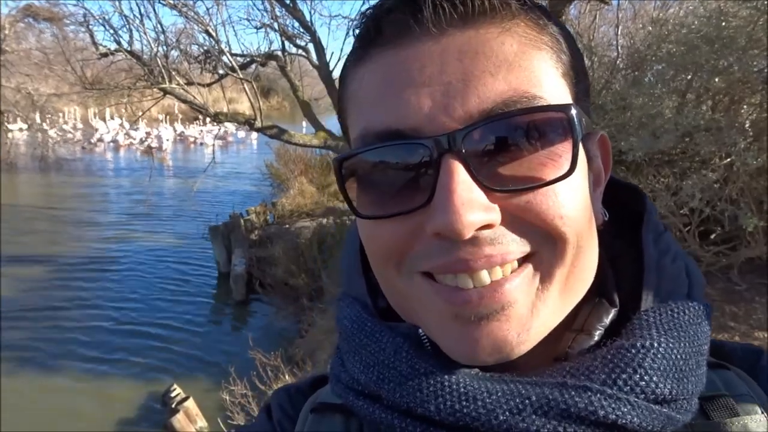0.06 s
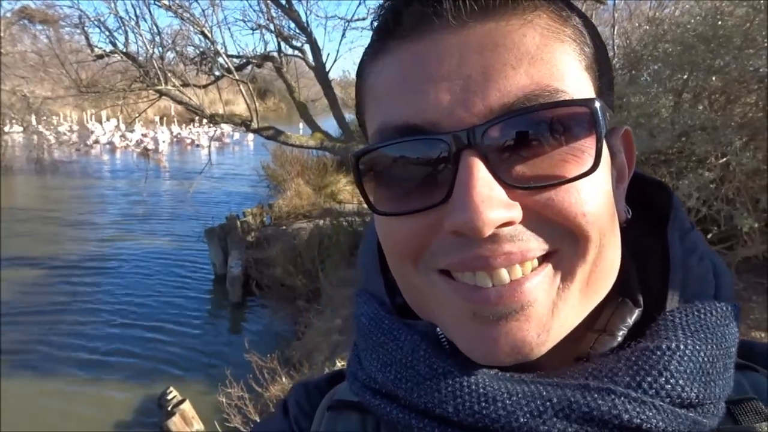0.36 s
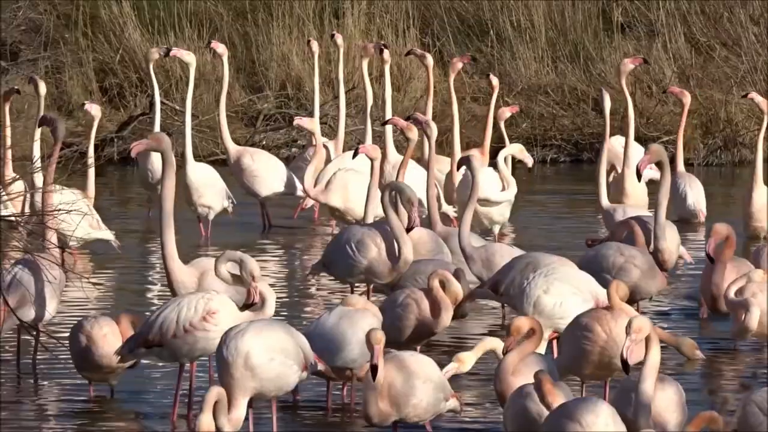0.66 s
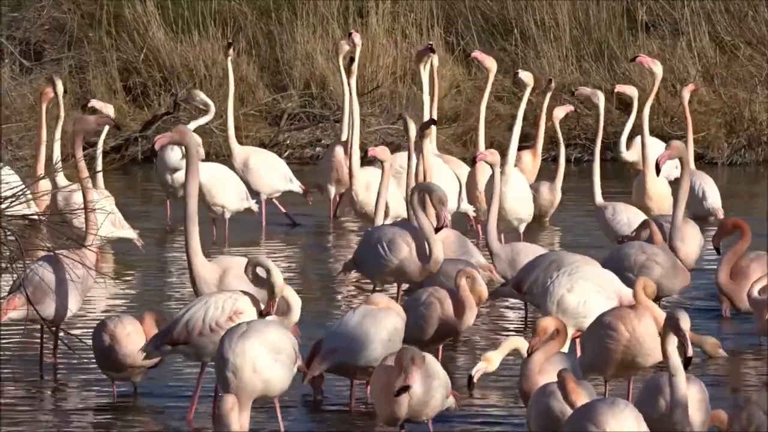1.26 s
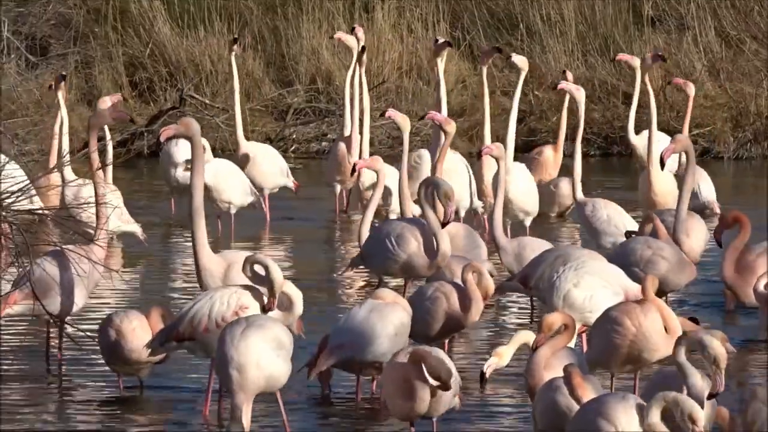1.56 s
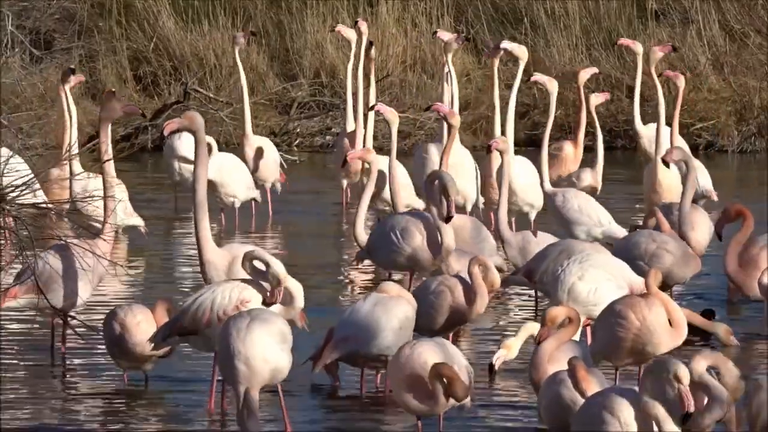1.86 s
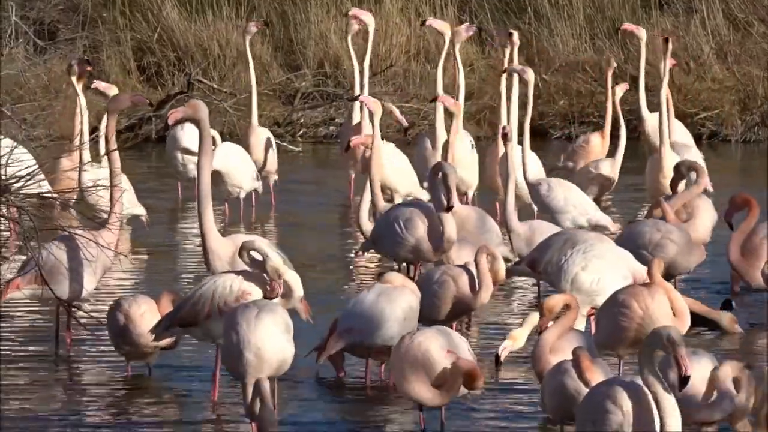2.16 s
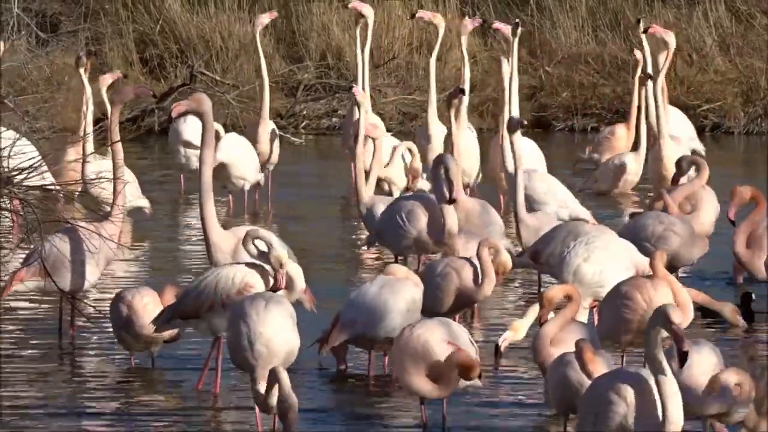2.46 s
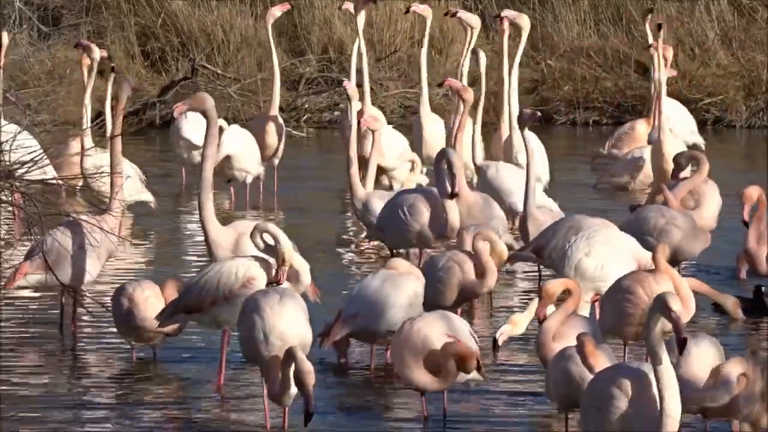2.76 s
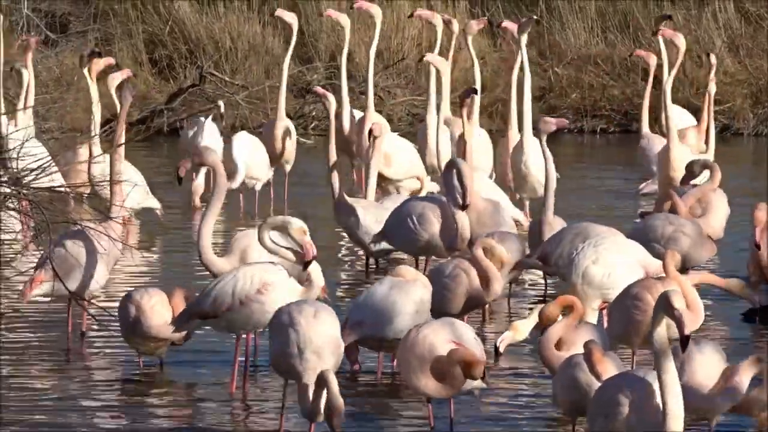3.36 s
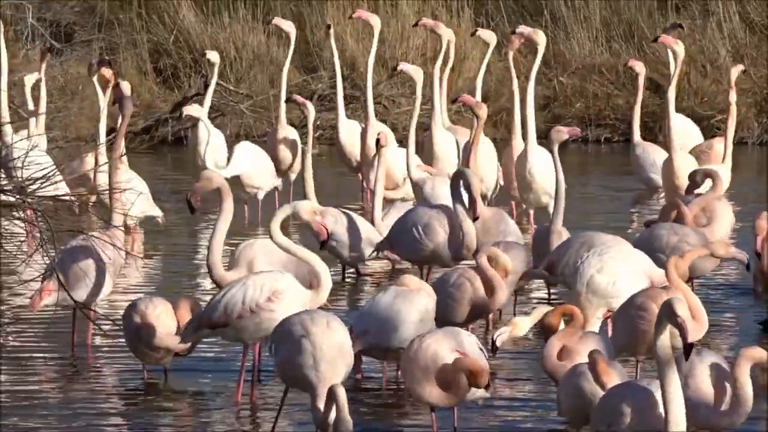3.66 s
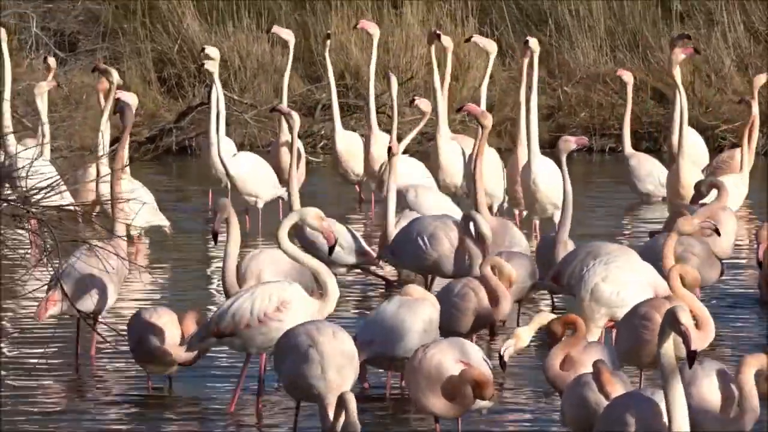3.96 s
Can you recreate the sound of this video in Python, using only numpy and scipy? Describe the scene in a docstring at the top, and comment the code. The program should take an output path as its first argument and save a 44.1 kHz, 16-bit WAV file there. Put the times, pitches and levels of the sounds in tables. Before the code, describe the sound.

Flamingos call on a shallow pond. From about 0.2 seconds one close bird, slightly left, gives four loud, rattling croaks that cut off abruptly at 0.6 seconds. From 0.7 seconds until the end at 4 seconds, the flock gabbles more quietly ahead, with overlapping croaks, short nasal honks and occasional hoarse rasps. Distant birds chatter underneath throughout, and the calls carry a faint outdoor echo.

```python
"""Flamingos in a shallow pond.

One close bird croaks four times until the sound cuts off abruptly; then the flock gabbles.
Croaks are pulse trains through throat resonances, honks are nasal harmonics shaped by the beak,
rasps are unvoiced air. Distant birds murmur, and the reedy bank gives a faint echo."""
import sys
import numpy as np
from scipy import signal
from scipy.fft import rfft, irfft, next_fast_len
from scipy.io import wavfile
from scipy.ndimage import map_coordinates

SR = 44100
rng = np.random.default_rng(int(sys.argv[2]) if len(sys.argv) > 2 else 0)


def int16_out(signal):
    """Quantize to a 16-bit WAV file."""
    q = np.round(np.clip(np.atleast_2d(signal).T, -1, 1) * 32767)
    wavfile.write(sys.argv[1], SR, q.astype(np.int16))


N = 176400


def amp(db):
    """Decibels to gain."""
    return 10 ** (np.asarray(db) / 20)

def unit(x):
    """Scale to rms 1."""
    return x / np.sqrt(np.mean(x ** 2) + 1e-20)

def level_at(spectrum, hz):
    """Level in dB, interpolated over log frequency."""
    f, db = np.transpose(spectrum)
    return np.interp(np.log(hz + 1), np.log(f + 1), db)

def colour(x, spectrum):
    """Zero-phase filter from (f/Hz, level/dB) points."""
    size = next_fast_len(len(x) + 1024)
    gain = amp(level_at(spectrum, np.fft.rfftfreq(size, 1 / SR)))
    return irfft(rfft(x, size) * gain, size)[:len(x)]

def add(mix, start_s, sound):
    """Mix a sound in at start_s."""
    at = round(start_s * SR)
    sound = sound[max(-at, 0):]
    part = mix[max(at, 0):][:len(sound)]
    part += sound[:len(part)]

def play(source, rows):
    """Mix one event per table row."""
    out = np.zeros(N)
    for row in rows:
        add(out, *source(*row))
    return out

def drift(samples, rate_hz):
    """Smooth random curve, rms about 1."""
    knots = rng.standard_normal(256)
    return map_coordinates(knots, [np.arange(samples) * rate_hz / SR], order=2, mode="mirror")

def resonate(x, hz, width_hz):
    """Steep resonance tracking the curve hz."""
    carrier = np.exp(2j * np.pi * np.cumsum(hz) / SR)
    r = np.exp(-np.pi * width_hz / SR)
    return (carrier * signal.lfilter([(1 - r) ** 2], [1, -2 * r, r * r], x / carrier)).real

def hump(progress, peak):
    """Sine arch over progress 0-1, highest at peak."""
    return np.sin(np.pi * np.interp(progress, [0, np.clip(peak, .05, .95), 1], [0, .5, 1]))

def bursts(since_s, width_s):
    """Long-tailed envelope around each pulse."""
    return (1 + (since_s / width_s) ** 2 / 2) ** -1.5

def scatter(x, t60_s):
    """Sparse, decaying reflections of random sign."""
    t = np.arange(SR // 2) / SR
    taps = rng.standard_normal(len(t)) * (rng.random(len(t)) < .1) * amp(-60 * t / t60_s)
    return signal.fftconvolve(x, taps / np.linalg.norm(taps))[:N]


# Open-air spectrum: f/Hz, level/dB
AIR_SPECTRUM = [(25, -21), (80, -30), (160, 1.5), (300, 15), (500, 3), (1500, 11), (11000, -1)]

def open_air(level_db=-62.5):
    """Faint, steady noise floor."""
    return amp(level_db) * unit(colour(rng.standard_normal(N), AIR_SPECTRUM))


# Soft low bumps: t/s, f/Hz, level/dB
BUMPS = [(.017, 264, -28.5), (0.07, 240, -31.5), (0.093, 201, -44), (3.85, 223, -46)]

def bump(centre_s, hz, level_db, width_s=.0026):
    """Dull push of about one cycle."""
    t = np.arange(-4 * width_s, 4 * width_s, 1 / SR)
    return centre_s + t[0], amp(level_db) * np.exp(-(t / width_s) ** 2) * np.sin(2 * np.pi * hz * t)


# Murmur envelope: t/s, level/dB
FAR_ENVELOPE = [(0, -29), (.13, -35), (.55, -34), (.62, -43.5), (.76, -43), (1.0, -37), (1.35, -41),
                (1.6, -38), (1.8, -43), (1.94, -40.5), (2.3, -34.5), (2.65, -35.5), (2.8, -38), (3.1, -32),
                (3.26, -38), (3.6, -35), (3.87, -33), (4, -33)]
# Murmur spectrum: f/Hz, level/dB
FAR_SPECTRUM = [(35, -58), (60, -44), (140, -37), (400, -22), (530, -6), (645, 0), (768, -2.5), (1090, -1),
                (1320, -1), (1610, -13), (1920, -1.5), (2380, -4.5), (2660, -10), (3170, -12), (7570, -30),
                (10000, -35.5), (11000, -42), (14200, -80), (22000, -120)]

def far_flock(calls_per_s=14, honk_db=-1, wash_db=-7):
    """Distant birds croak and honk at random, calls_per_s of each, over a blur of still more."""
    total_s = N / SR
    count = int(calls_per_s * total_s)
    wash, breath = rng.standard_normal((2, N))
    rattle = np.zeros(N)
    for at, speed, span, distance in rng.random((count, 4)):
        t = np.arange(0, .14 + .047 * span, 1 / SR)
        pulse_hz = 58 + 30 * speed
        pulses = np.exp(5 * (np.cos(2 * np.pi * pulse_hz * t) - 1))
        add(rattle, at * total_s - .05, amp(-8 * distance) * np.sin(np.pi * t / t[-1]) * pulses)
    honks = [(at * total_s, .037 + .066 * span, 500 + 300 * high, -.06 + .076 * bend, .025,
              -6 * distance, 1150, 4, 0, .5)  # columns as in HONKS
             for at, span, high, bend, distance in rng.random((count, 5))]
    croaks = scatter(np.sqrt(abs(rattle)) * breath, t60_s=.035)
    layers = (0, croaks), (honk_db, play(honk, honks)), (wash_db, wash)
    murmur = unit(sum(amp(db) * unit(colour(x, FAR_SPECTRUM)) for db, x in layers))
    return murmur * amp(np.interp(np.arange(N) / SR, *np.transpose(FAR_ENVELOPE)))


# Lower and upper throat resonance: f/Hz, level/dB
RASP_LOWER = [(200, -38), (600, -16.5), (900, 7.5), (1200, 8), (1650, -2), (4000, -61)]
RASP_UPPER = [(600, -33), (1700, -34), (2400, 7.5), (2800, 6), (3300, 0), (4200, -5.5), (5400, -9.5),
              (7000, -12.5), (11000, -23)]
# Rasps: t/s, length/s, lower level/dB, upper level/dB
RASPS = [(-.02, 0.099, -41, -43), (0.77, 0.12, -40.5, -36.5), (1.809, 0.093, -50, -40.5),
         (1.946, 0.11, -40.5, -41.5), (2.068, 0.099, -40.5, -37), (2.83, 0.058, -37, -38),
         (3.36, 0.061, -45, -44), (2.916, 0.12, -34, -36.5), (3.02, .19, -35.5, -38),
         (3.73, 0.13, -36.5, -35.5), (3.849, 0.095, -39.5, -34.5)]

def rasp(start_s, length_s, lower_db, upper_db):
    """Hoarse, unvoiced call: fluttering air in two throat resonances."""
    t = np.arange(0, length_s, 1 / SR)
    air = rng.standard_normal(len(t)) * amp(3.4 * drift(len(t), rate_hz=303.3))
    swell = abs(np.sin(np.pi * t / length_s)) ** .5
    lower = amp(lower_db) * unit(colour(air, RASP_LOWER) * swell)
    upper = amp(upper_db) * unit(colour(air, RASP_UPPER) * swell)
    return start_s, lower + upper


# Envelope of the harmonics: f/Hz, level/dB
HONK_SPECTRUM = [(350, -18.5), (700, -1), (1200, 0.5), (1650, -3.5), (2100, 1.5), (3200, -6.5), (4100, -9),
                 (4900, -11), (6000, -17), (7000, -21.5), (11000, -27.5)]
# Honks: t/s, length/s, pitch/Hz, glide/pitch, arch/pitch, level/dB,
# beak resonance/Hz, beak boost/dB, brightness/dB, hoarseness/0-1
HONKS = [(.665, 0.059, 813, -0.076, 0.034, -47, 820, 7.4, 9.5, 0.43),
         (.752, 0.095, 566, 0.16, 0.003, -47.5, 570, 5.7, 0, .2),
         (.808, 0.12, 695.3, 0.0054, 0.068, -41, 1410, 6, -12, .15),
         (1.08, 0.089, 606, -0.05, 0.013, -43.5, 1220, 7.1, -3.5, 0.54),
         (1.24, 0.062, 635, -0.061, .02, -44.5, 1905, 5.9, 8.5, 0.83),
         (1.531, 0.059, 556, 0.097, 0.049, -52.5, 1080, 5.8, -18, .4),
         (1.645, 0.08, 605, -0.037, 0.012, -48, 1220, 14, 3.5, 0.66),
         (1.655, 0.11, 729.4, .08, 0.0016, -48, 1440, 7.7, -12, 0.27),
         (1.68, 0.077, 825, .1, 0, -47, 1640, 3, -5, 0.25),
         (1.805, 0.052, 521, -0.02, 0, -47.5, 1040, 13.2, 1, .3),
         (1.838, 0.067, 651.7, 0.02, 0.028, -44.5, 1310, 13, -0.5, .2),
         (1.965, 0.074, 694, -0.048, 0.014, -44, 1390, 3.3, 5, 0.22),
         (2.065, 0.048, 562, -0.073, 0.029, -41.5, 1130, 3, -13, 0.43),
         (2.258, 0.071, 637.6, -0.012, 0.0077, -43, 2560, 12, -2, 0.089),
         (2.275, .085, 630, -0.033, .02, -46, 1905, 10, -11, 0.26),
         (2.35, 0.097, 499.5, 0.032, 0.011, -42, 950, 3.4, -17, 0.81),
         (2.435, 0.097, 606.5, -0.03, 0, -50, 1220, 14, 8, 0.58),
         (2.755, 0.058, 688, -0.04, .02, -49, 1390, 13.4, 6.5, .3),
         (2.82, 0.072, 708, 0.069, 0.03, -41, 1390, 7.1, -5, 0.43),
         (2.93, .063, 794, -.095, .02, -41.5, 800, 6.4, -7, 0.53),
         (3.074, 0.07, 691, 0.0039, 0.016, -42.5, 2800, 14.4, -2.5, 0.13),
         (3.07, .115, 614.4, -.025, 0.047, -43.5, 1851, 16.8, 2, 0.26),
         (3.165, .045, 647, -0.059, 0.017, -52, 1300, 14, 11, 0.42),
         (3.76, 0.091, 808, -.04, 0.02, -44.5, 815, 6.7, 1, .2),
         (3.825, 0.089, 686, -0.015, 0.0012, -44, 700, 9.4, 7, 0.2),
         (3.9, 0.097, 606, -0.034, 0.0077, -50, 1217, 12, 8, 0.26),
         (3.903, 0.0606, 693, -0.028, 0.016, -37.5, 2790, 10.6, 0, .1),
         (3.903, 0.061, 792, -0.029, 0.0096, -41, 3170, 10.5, 12, 0.1),
         (3.967, 0.058, 605, 0.043, 0.015, -45, 3030, 12, 2.5, 0.36)]

def honk(start_s, length_s, pitch_hz, glide, arch, level_db, beak_hz, boost_db, bright_db, hoarse):
    """Nasal call: pitch arches, then drops; the beak lifts nearby harmonics; high ones are rough."""
    edge_s, beak_width_hz, rough_hz, uneven_db = .016, 310, 463, 1.5
    t = np.arange(0, length_s, 1 / SR)
    n, progress = len(t), t / length_s
    bend = glide * (progress - .5) + arch * (np.sin(np.pi * progress) - .7)
    jitter = .003 * drift(n, rate_hz=253)
    end_drop = .017 * np.exp((t - length_s) / edge_s)
    cycles = np.cumsum(pitch_hz * (1 + bend + jitter - end_drop)) / SR
    voice = np.zeros(n)
    for k in range(1, 16):
        hz = k * pitch_hz
        beak_db = boost_db * np.exp(-((hz - beak_hz) / beak_width_hz) ** 2)
        shelf_db = np.interp(hz, [1100, 4500], [0, bright_db])
        gain = amp(level_db + level_at(HONK_SPECTRUM, hz) + beak_db + shelf_db)
        rough = np.clip(.14 + hoarse * hz / 3500 + (hz / 8500) ** 4, 0, 1)
        fuzz = (drift(n, rough_hz) + 1j * drift(n, rough_hz)) / np.sqrt(2)
        carrier = np.exp(2j * np.pi * (k * cycles + rng.random()))
        partial = ((np.sqrt(1 - rough ** 2) + rough * fuzz) * carrier).real
        voice += np.sqrt(2) * gain * partial * amp(uneven_db * drift(n, rate_hz=29))
    fade = np.minimum(np.minimum(t, length_s - t) / edge_s, 1)
    flutter = 1 + .08 * drift(n, rate_hz=187)
    return start_s, voice * fade * flutter


# Throat resonances: f/throat tone, width/Hz, roughness/0-1, level/dB
THROAT_MODES = [(.99, 375, 0.36, -8), (1.95, 515, 0.65, -2), (2.948, 720, 0.67, -3.5),
                (4.3, 1390, 0.8, -9.5)]
# Croak hiss: f/Hz, level/dB
HISS_SPECTRUM = [(300, -7), (600, -7.5), (1500, 12), (4000, -46), (5600, -1), (7000, 1), (8500, 0.5),
                 (11000, -10)]
# Flock croaks: t/s, pulses, rate/Hz, throat tone/Hz, first resonance/dB,
# second resonance/dB, treble/dB, hiss/dB, peak position/0-1
FLOCK_CROAKS = [(0.681, 5.0, 58, 1060.0, -31.5, -37.5, -39, -57.5, 0.18),
                (0.912, 6.0, 84, 1100.0, -29.5, -37, -34.5, -46, 0.71),
                (0.98, 7.0, 79, 1060.0, -23, -32.5, -34.5, -40.5, 0.41),
                (1.153, 6.0, 92, 1100.0, -31, -41.5, -34.5, -45.5, 0.4),
                (1.252, 6.0, 71, 1140.0, -26.5, -35, -37.5, -48.5, 0.45),
                (1.356, 3.0, 59, 1130.0, -33, -42.5, -59, -70, 0.83),
                (1.403, 5.0, 70.5, 1170.0, -22.5, -33, -37, -50, 0.46),
                (1.479, 3.0, 59, 1150.0, -32.5, -46, -53, -80, 0.5),
                (1.742, 3.0, 76, 1190.0, -28.5, -41, -50.5, -59, 0.33),
                (1.818, 6.0, 59.24, 1040.0, -32.5, -38.5, -52, -71, 0.5),
                (1.969, 6.0, 63.7, 1080.0, -33, -38.5, -39, -46.5, 0.51),
                (2.1, 7.0, 68.14, 1040.0, -29, -35, -37, -54, 0.52),
                (2.241, 7.0, 58, 1020.0, -31, -39, -39, -51.5, 0.34),
                (2.375, 5.0, 67, 1020.0, -29, -36, -40.5, -54.5, 0.55),
                (2.468, 7.0, 66.7, 1180.0, -24.5, -33, -36.5, -45, 0.47),
                (2.588, 7.0, 73, 1190.0, -24.5, -32, -36.5, -42.5, 0.47),
                (2.69, 7.0, 80, 1040.0, -25.5, -33.5, -42, -45.5, 0.59),
                (2.852, 5.0, 74, 1050.0, -34, -41, -39, -59, 0.27),
                (2.922, 6.0, 64.4, 1050.0, -35, -34.5, -35.5, -49.5, 0.62),
                (3.042, 6.0, 76, 1040.0, -37, -42, -50, -52, 0.73),
                (3.163, 5.0, 68.4, 1000.0, -31.5, -36, -37, -46.5, 0.26),
                (3.295, 6.0, 62.7, 1010.0, -26, -32.5, -38, -52.5, 0.47),
                (3.415, 6.0, 70, 1170.0, -24, -29.5, -36, -47.5, 0.62),
                (3.493, 3.0, 62, 1020.0, -31, -35, -42, -52.5, 0.3),
                (3.56, 3.0, 64, 1280.0, -33, -38, -39.5, -47, 0.23),
                (3.614, 4.0, 61, 1090.0, -31, -33.5, -39.5, -46, 0.36),
                (3.687, 5.0, 71, 1030.0, -29.5, -33, -37.5, -43.5, 0.32),
                (3.776, 5.0, 65, 1150.0, -38, -42, -52, -49, 0.6),
                (3.852, 6.0, 80.0, 1090.0, -24, -30.5, -36.5, -38.5, 0.59)]

def flock_croak(start_s, pulses, rate_hz, tone_hz, first_db, second_db, treble_db, hiss_db, peak):
    """Slow, uneven pulses gate a rough throat tone; level and tone rise and fall together."""
    jitter_s, spread_db, swell_db, low_cut_hz = .000083, 1.2, 5, 520
    count = max(round(pulses), 1)
    t = np.arange(-1 / rate_hz, count / rate_hz, 1 / SR)
    n = len(t)
    arch = hump((t * rate_hz + .5) / count, peak)
    lateness, strength = rng.standard_normal((count, 2)).T
    since_s = t - (np.arange(count) / rate_hz + jitter_s * lateness)[:, None]

    def gate(width_s):
        """Burst train; pulse strength is part shared, part drawn per band."""
        sizes = amp(spread_db * (strength + rng.standard_normal(count)) / np.sqrt(2))
        return sizes @ bursts(since_s, width_s) * amp(swell_db * arch)

    hz = tone_hz * (1 + .0999 * (arch - .7) + .04 * drift(n, rate_hz=70))
    wobble = 1 + .0299 * drift(n, rate_hz=216.5)
    cycles = np.cumsum(hz * wobble) / SR
    out = amp(hiss_db) * unit(gate(width_s=.0017) * colour(rng.standard_normal(n), HISS_SPECTRUM))
    bands = (first_db, .0027), (second_db, .0027), (treble_db, .0026), (treble_db, .0026)
    for (ratio, width_hz, rough, mode_db), (band_db, burst_s) in zip(THROAT_MODES, bands):
        breath = unit(resonate(rng.standard_normal(n), ratio * hz, width_hz))
        tone = unit(np.sin(2 * np.pi * ratio * cycles))
        voice = np.sqrt(1 - rough) * tone + np.sqrt(rough) * breath
        out += amp(band_db + mode_db) * unit(gate(burst_s) * voice)
    low_cut = signal.butter(3, low_cut_hz, "highpass", fs=SR, output="sos")
    return start_s + t[0], signal.sosfilt(low_cut, out) * signal.windows.tukey(n, .1)


# Close bird's throat resonances: f/main resonance, level/dB
NEAR_MODES = [(.47, -19.5), (1, 2), (1.53, -5.5), (1.99, -8.5), (2.58, -11), (3.2, -24)]
# Air puff spectrum and low cut: f/Hz, level/dB
PUFF_SPECTRUM = [(300, -36), (800, -5), (1500, -2), (2200, 7.5), (3600, -1.5), (4200, 0.5), (5000, -14),
                 (6000, -12), (7000, -12.5), (11000, -17.5)]
NEAR_LOW_CUT = [(100, -20), (450, 0)]
# Close croaks: t/s, pulses, first rate/Hz, last rate/Hz, main resonance/Hz,
# level/dB, treble/dB, peak position/0-1
NEAR_CROAKS = [(.163, 5, 70, 66, 2260, -18.5, -10, .55), (.249, 10, 78, 74, 2360, -17.5, -3.5, .24),
               (.383, 10, 74, 88, 2210, -14.5, -1, .5), (.5058, 7, 85, 86, 2140, -13, 0, .7)]

def near_croak(start_s, pulses, first_hz, last_hz, main_hz, level_db, treble_db, peak):
    """Even, sharp pulses each ring the throat's resonances and release a puff of air."""
    jitter_s, ring_s, puff_s = .0003, .003, .0031
    swell_db, spread_db, puff_db = 7.5, .8, -6
    count = max(round(pulses), 2)
    gaps_s = 1 / np.linspace(first_hz, last_hz, count - 1)
    times_s = np.cumsum(np.r_[0, gaps_s]) + jitter_s * rng.standard_normal(count)
    t = np.arange(-1 / first_hz, times_s[-1] + 1 / last_hz, 1 / SR)
    since_s = t - times_s[:, None]
    arch = hump((np.arange(count) + .5) / count, peak)
    sizes = amp(level_db + swell_db * (arch - 1) + spread_db * rng.standard_normal(count))
    air = unit(colour(rng.standard_normal(len(t)), PUFF_SPECTRUM))
    out = amp(puff_db) * air * (sizes @ bursts(since_s, puff_s))
    for ratio, mode_db in NEAR_MODES:
        hz = ratio * main_hz * (1 + .04 * rng.standard_normal((count, 1)))
        rings = np.exp(-(since_s / ring_s) ** 2 * np.sqrt(ratio)) * np.cos(2 * np.pi * hz * since_s)
        out += amp(mode_db + treble_db * (ratio > 1)) * (sizes @ rings)
    return start_s + t[0], colour(out, NEAR_LOW_CUT) * signal.windows.tukey(len(t), .1)

def near_bird(lead_s=.000045, pan_db=.86, echo_db=-8, cut_s=.5785, fade_s=.0011):
    """Close bird, earlier and louder on the left; the sound, echo included, cuts off abruptly."""
    voice = play(near_croak, NEAR_CROAKS)
    direct = np.array([np.roll(voice, -round(lead_s * SR)) * amp(pan_db), voice * amp(-pan_db)])
    echo = amp(echo_db) * np.array([scatter(ear, t60_s=.17) for ear in direct])
    return (direct + echo) * np.clip((cut_s - np.arange(N) / SR) / fade_s, 0, 1)


# Stereo width of the scattered sound: f/Hz, side re mid/dB
SIDE_SPECTRUM = [(100, -9), (250, -10.5), (500, -17.5), (1000, -15), (2000, -7.5), (4000, -6.5), (8000, -3),
                 (11000, -4)]

def scene(echo_db=-6):
    """Close bird slightly left; flock ahead, widened by water and bank."""
    close = near_bird()
    flock = play(flock_croak, FLOCK_CROAKS) + play(honk, HONKS) + play(rasp, RASPS)
    air = open_air()
    bank_echo = amp(echo_db) * scatter(flock, t60_s=.14)
    mid = flock + bank_echo + far_flock() + air + play(bump, BUMPS)
    side = colour(scatter(mid, t60_s=.12), SIDE_SPECTRUM)
    side -= mid * (side @ mid) / (mid @ mid)  # keeps the flock centred
    return close + np.array([mid + side, mid - side])

def record(dry):
    """Steep low-pass at 11.1 kHz."""
    low_pass = signal.firwin(511, 11100, window=("kaiser", 9), fs=SR)
    return signal.oaconvolve(dry, low_pass[None], "same")


dry = scene()
out = record(dry)
int16_out(out)
```